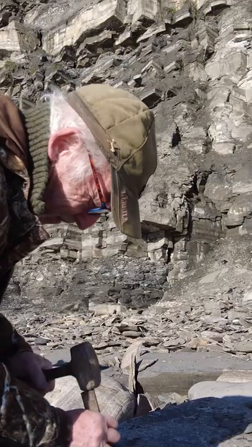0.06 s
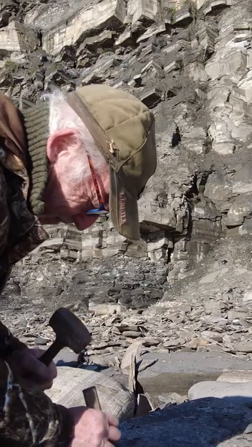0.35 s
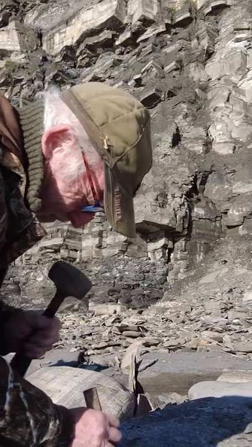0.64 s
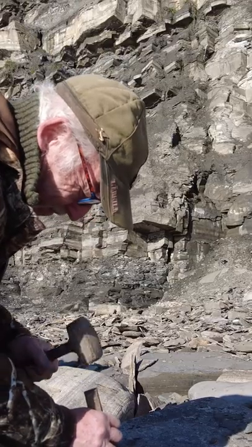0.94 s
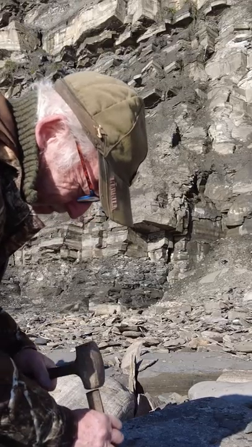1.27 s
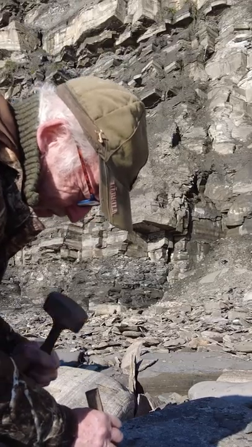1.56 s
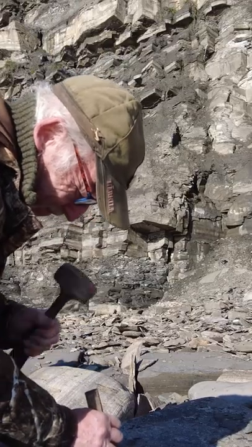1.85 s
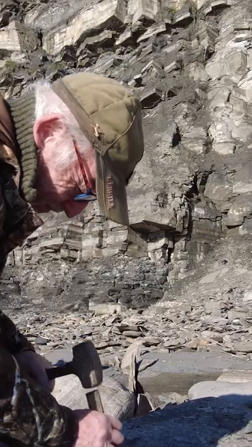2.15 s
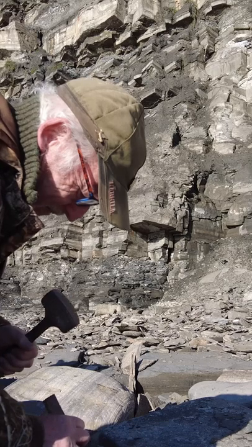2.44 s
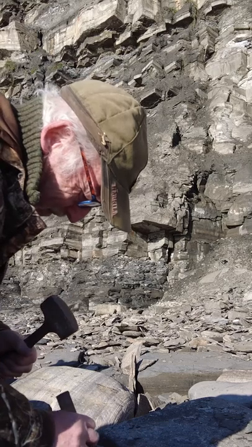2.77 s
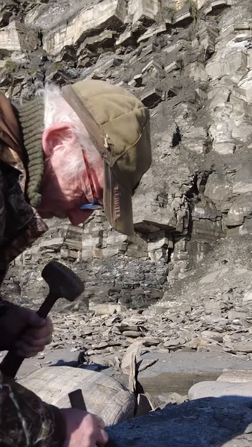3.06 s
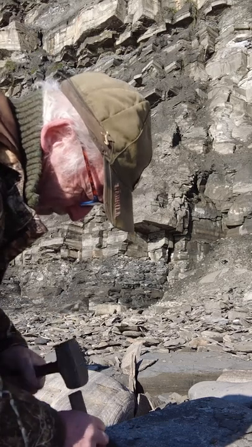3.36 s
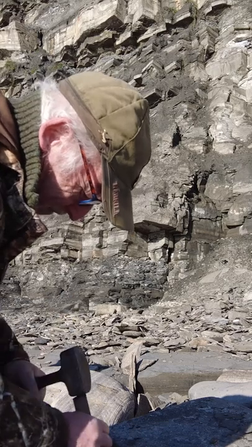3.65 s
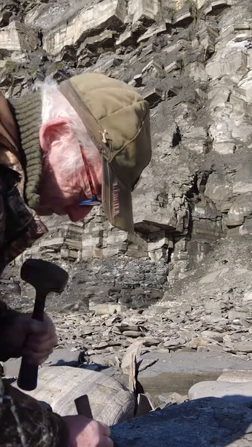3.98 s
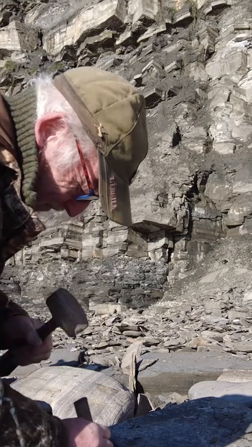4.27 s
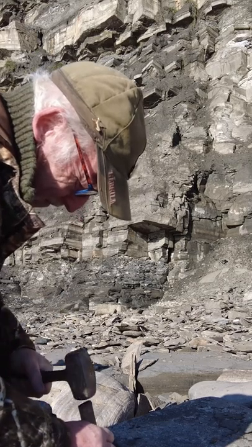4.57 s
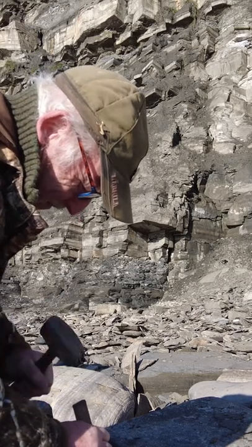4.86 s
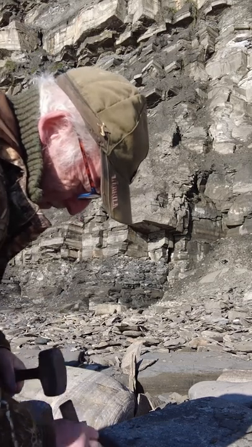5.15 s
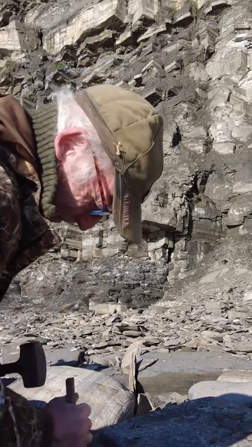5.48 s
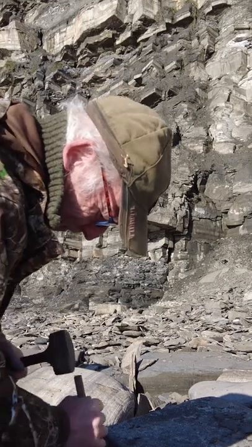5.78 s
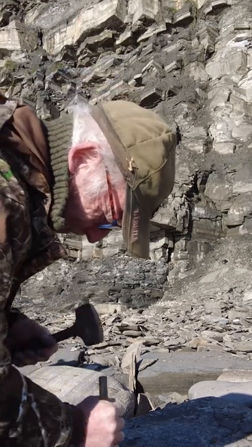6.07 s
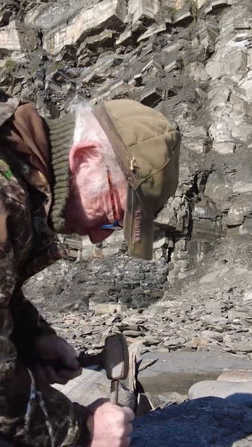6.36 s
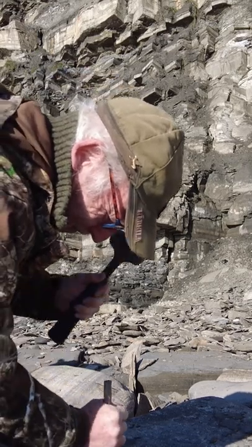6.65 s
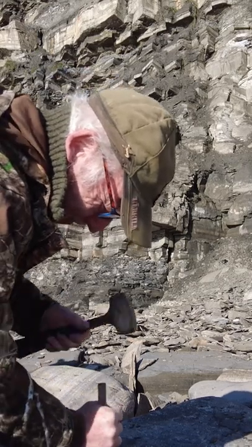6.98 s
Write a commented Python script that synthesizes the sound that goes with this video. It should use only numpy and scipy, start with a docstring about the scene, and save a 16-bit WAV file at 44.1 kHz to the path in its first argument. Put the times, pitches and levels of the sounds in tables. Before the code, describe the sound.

Close by, a mallet drives a steel chisel into a boulder on a beach. Each blow is a sharp crack with a dull rock thud and a short steel ring, often followed by a lighter bounce. Six steady blows come, then five, then two. In the second pause, chips tick and the chisel faintly clinks and scrapes. A cliff returns a light echo over faint distant surf and a little wind on the microphone.

```python
"""A mallet drives a hand-held steel chisel into a boulder on a beach, in three runs of blows.
Each blow is a crack, a thud of rock and a short ring of steel; mostly the mallet bounces after it.
Blows differ in force, seat of the edge, looseness of grip, squareness of the hit and bite.
Chips land; in a pause the chisel clinks and drags to a new spot. A cliff throws the blows back.
Far surf and a little wind lie underneath."""
import sys
import numpy as np
from scipy import signal
from scipy.fft import rfft, irfft
from scipy.io import wavfile

SR = 44100
rng = np.random.default_rng(int(sys.argv[2]) if len(sys.argv) > 2 else 0)


def wav_record(signal):
    """Record a signal, one row per channel, as 16-bit PCM in the file named by sys.argv[1]."""
    frames = np.transpose(np.atleast_2d(signal))
    bounded = np.clip(frames, -1, 1)
    # unit amplitude maps onto the largest positive 16-bit level
    quanta = np.round(bounded * 32767).astype(np.int16)
    wavfile.write(sys.argv[1], SR, quanta)


N = 313992
T = np.arange(N) / SR
HIT_T = T[:SR // 4]


def from_db(db):
    """Decibels to gain."""
    return 10 ** (np.asarray(db) / 20)


def unit_rms(x):
    """Scale to rms 1."""
    return x / np.sqrt(np.mean(x ** 2) + 1e-20)


def at_hz(points, hz):
    """Interpolate a table over log frequency."""
    known, values = np.transpose(points)
    return np.interp(np.log(hz + 1), np.log(known), values)


def bins_hz(x):
    """Frequencies of the spectrum of x."""
    return np.fft.rfftfreq(x.shape[-1], 1 / SR)


def coloured(x, colour):
    """Filter by rows of f/Hz, level/dB."""
    return irfft(rfft(x) * from_db(at_hz(colour, bins_hz(x))), x.shape[-1])


def fade(t60_s):
    """Exponential decay, 60 dB in t60_s."""
    return np.exp(-np.log(1000) * HIT_T / t60_s)


def swells(rows):
    """One Gaussian rise and fall per row."""
    return sum(from_db(db) * np.exp(-(2 * (T - s) / length_s) ** 2) for s, length_s, db in rows)


def levelled(x, db):
    """Scale a hit so its energy, spread over 10 ms, has this level."""
    return x * from_db(db) / np.sqrt(np.sum(x ** 2) / (SR / 100))


def add(track, start_s, sound):
    """Mix a sound in at start_s."""
    at = min(max(round(start_s * SR), 0), N)
    track[at:at + len(sound)] += sound[:N - at]


def ring(modes, spread_db, detune, stagger_s):
    """Struck modes; grip and contact point vary their strength, pitch and onset."""
    out = 0
    for (hz, db, t60_s), (strength, shift, late) in zip(modes, rng.standard_normal((len(modes), 3))):
        age_s = np.maximum(HIT_T - abs(late) * stagger_s, 0)
        envelope = from_db(db + spread_db * strength) * fade(t60_s)
        out = out - envelope * np.sin(2 * np.pi * hz * (1 + detune * shift) * age_s)
    return out


def tilted(modes, db_per_oct):
    """Tilt mode levels about the first mode."""
    return [(hz, db + db_per_oct * np.log2(hz / modes[0][0]), t60_s) for hz, db, t60_s in modes]


# surf spectrum: f/Hz, level/dB
SURF_COLOUR = [(53, -39.5), (90, -5), (224, -10.5), (296, -6.5), (385, -7), (457, -5.5), (532, -6),
               (568, -5), (1140, -14), (1350, -9.5), (2130, -17), (2710, -18), (3910, -23), (6160, -29.5),
               (16000, -43)]
# background of surf and lingering cliff reverberation: t/s, level/dB before gain_db
SURF_LEVEL = [(0.0, -61), (2.99, -63), (3.43, -61), (6.09, -62.5), (6.68, -60.5), (7.12, -59.5)]
# surf, left against right: f/Hz, coherence
SURF_COHERENCE = [(60, 0.85), (130, 0.91), (290, 1), (640, .42), (1400, .25), (4000, .3), (15000, 0.32)]


def surf(gain_db=2):
    """Far surf: noise, wide in the treble, slightly louder during the runs of blows as the cliff's
    reverberation lingers."""
    mid, side = rfft(rng.standard_normal((2, N)))
    coherence = np.clip(at_hz(SURF_COHERENCE, bins_hz(T)), 0, 1)
    wide = irfft(np.sqrt(1 + coherence) * mid + np.sqrt(1 - coherence) * side * [[1], [-1]], N)
    level_db = gain_db + np.interp(T, *np.transpose(SURF_LEVEL))
    return unit_rms(coloured(wide, SURF_COLOUR)) * from_db(level_db)


# gusts: middle t/s, length/s, level/dB
GUSTS = [(1.07, .25, -49.5), (1.63, 0.1, -43.5), (3.45, .2, -53.5), (5.22, .07, -51)]


def wind(band_hz=(18, 48), breeze_db=-60):
    """Wind on the microphone: a low steady rumble with gusts."""
    band = signal.butter(2, band_hz, "band", fs=SR, output="sos")
    buffeting = unit_rms(signal.sosfilt(band, rng.standard_normal(N)))
    return buffeting * np.hypot(from_db(breeze_db), swells(GUSTS))


def echo_envelope(faces, t):
    """Each rough face answers after its delay, swells as more of it is reached, and dies away."""
    power = 0
    for delay_s, db, swell_s in faces:
        age = np.maximum(t - delay_s, 0) / swell_s
        power = power + (from_db(db) * age * np.exp(1 - age)) ** 2
    return np.sqrt(power)


# echoing faces: nearby beach stones (first close row), the close cliff, and further along: delay/s, relative
# level/dB, swell/s
CLOSE_FACES = [(.006, -15.5, .02), (.047, -2, .009), (0.074, -4.5, 0.012)]
FAR_FACES = [(0.099, -4, .065), (.163, 1.5, .009), (.212, -2, .016), (.27, -17, .09)]
# their echo spectra: f/Hz, level/dB
CLOSE_COLOUR = [(150, 2), (600, -3.5), (1200, 1.5), (2300, 8), (3100, 4), (4200, 2.5), (7000, 2.5),
                (10000, 0), (15000, 0)]
FAR_COLOUR = [(200, -11.5), (1000, 0), (3100, 5), (4000, 2), (6000, -1.5), (10000, -8.5), (15000, -12)]


def cliff_echo(x, faces, colour, grain_db):
    """Countless ledges echo, unlike left and right; moving air reshuffles them for each blow."""
    t = T[:SR * 2 // 3]
    envelope = echo_envelope(faces, t)
    starts = [0] + [round((s - .01) * SR) for s, *_ in BLOWS[1:]]
    out = np.zeros((2, N))
    for start, end in zip(starts, starts[1:] + [N]):
        ledges = rng.standard_normal((3, len(t))) * from_db(grain_db * rng.standard_normal(len(t)))
        response = (ledges[:2] + .65 * ledges[2]) * envelope  # third row common to both sides
        response /= np.sqrt(np.sum(response ** 2) / 2)
        echo = signal.fftconvolve(x[None, start:end], response, axes=1)
        out[:, start:start + echo.shape[1]] += echo[:, :N - start]
    return coloured(out, colour)


# clang towards the cliff, blurred by the hand: f/Hz, level/dB, t60/s
BROAD_CLANG = [(3090, 0, .015)]


def towards_cliff(clang_db=-30, ping_db=-33):
    """Outgoing sound: each blow's bare click, and the steel as far as the grip lets it out."""
    out = np.zeros(N)
    impulse = 1.0 * (HIT_T == 0)
    click = np.roll(coloured(impulse, CRACK_COLOUR), 32)
    for s, force_db, seat_db, loose_db, square_db, *_ in BLOWS:
        clang = ring(stiffened(BROAD_CLANG, seat_db), spread_db=1, detune=.013, stagger_s=.0008)
        ping = ring(PING, spread_db=0, detune=.001, stagger_s=.00057)
        add(out, s, levelled(click, CRACK_DB + force_db))
        add(out, s, levelled(clang, clang_db + force_db + loose_db))
        add(out, s, levelled(ping, ping_db + force_db + square_db))
    return out


# sand under the boulder: f/Hz, relative level/dB, t60/s
SAND_MODES = [(62.6, -3.5, 0.11), (82, -1, 0.34)]


def sand(re_thud_db=-22):
    """Each blow pushes the boulder a little into the sand."""
    out = np.zeros(N)
    for s, force_db, seat_db, *_ in BLOWS:
        thump = ring(SAND_MODES, spread_db=4, detune=.037, stagger_s=.002)
        add(out, s, levelled(thump, thud_level_db(force_db, seat_db) + re_thud_db))
    return out


# edge dragged to its new spot: middle t/s, length/s, level/dB
DRAGS = [(5.5, 0.057, -70), (5.7, 0.21, -72)]


def dragging(grain_db=4):
    """Sand grains rasp faintly between steel and stone."""
    grains = rng.standard_normal(N) * from_db(grain_db * rng.standard_normal(N))
    rasp = coloured(grains, [(1500, -25), (4000, 1), (6000, -2), (12000, -10), (16000, -11.5)])
    return unit_rms(rasp) * swells(DRAGS)


# larger stone chips: t/s, peak level/dB, f/Hz
CHIPS = [(.416, -42, 6150), (5.2533, -37.5, 5670), (5.2762, -42.5, 4370), (5.3702, -46.5, 6350),
         (5.422, -46.5, 3500), (6.751, -46, 2160)]


def chips(t60_s=.011, grit_flight_s=.28, grit_db=-57, grit_hz=7074, scatter=.22):
    """Chips tick as they land, as does a crumb of grit thrown by each blow."""
    out = np.zeros(N)
    factors = np.exp(scatter * rng.standard_normal((len(BLOWS), 2)))
    grit = [(s + grit_flight_s * flight, grit_db, grit_hz * pitch)
            for (s, *_), (flight, pitch) in zip(BLOWS, factors)]
    for s, db, hz in CHIPS + grit:
        edges_hz = [min(hz * .8, SR / 4), min(hz * 1.45, .45 * SR)]
        band = signal.butter(2, edges_hz, "band", fs=SR, output="sos")
        tick = signal.sosfilt(band, rng.standard_normal(len(HIT_T)) * fade(t60_s))
        add(out, s, from_db(db) * tick / np.abs(tick).max())
    return out


# loosely held chisel: f/Hz, relative level/dB, t60/s
LOOSE_STEEL = [(3978, 0, .11), (6325, -12, .086), (7951, -10, .09), (9200, -8, .08), (12460, -15, .065)]


def touch(db, db_per_oct, tick_db):
    """The loose chisel ticks and rings; a harder, shorter touch favours high modes."""
    steel = ring(tilted(LOOSE_STEEL, db_per_oct), spread_db=1, detune=.001, stagger_s=.0005)
    return levelled(steel, db) + levelled(crack(db_per_oct=-2.5, t60_s=.018), db + tick_db)


# loose chisel touches stone: t/s, level/dB
CLINKS = [(5.314, -66), (5.4894, -61.5), (5.568, -56)]
# mallet is rested on the chisel: t/s, rock level/dB, steel level/dB
MALLET_RESTS = [(2.756, -48, -60.5), (5.964, -50.5, -81)]


def handling():
    """The chisel clinks on the stone; the resting mallet bumps the boulder through it."""
    out = np.zeros(N)
    for s, db in CLINKS:
        add(out, s, touch(db, db_per_oct=-.5, tick_db=-8))
    for s, bump_db, steel_db in MALLET_RESTS:
        add(out, s, touch(steel_db, db_per_oct=18, tick_db=2.8))
        add(out, s, levelled(ring(THUD, spread_db=1.5, detune=.02, stagger_s=.001), bump_db))
    return out


# mallet drops back on the chisel: t/s, base level/dB
BOUNCES = [(0.5013, -33), (0.895, -31), (1.3084, -38), (1.7235, -35), (2.160, -32), (3.353, -35),
           (4.181, -38), (4.593, -35.5), (5.010, -45.5), (6.465, -22.5), (6.922, -34)]


def bounces(tick_db=-4, rock_db=-5, clang_db=-6, follow=.59):
    """A softer contact: less crack, more ring, with the seat and grip of the blow before."""
    out = np.zeros(N)
    for s, db in BOUNCES:
        _, _, seat_db, loose_db, *_ = [blow for blow in BLOWS if blow[0] < s][-1]
        tick = crack(db_per_oct=-3, t60_s=.02)
        rock = ring(THUD + KNOCK, spread_db=2.5, detune=.013, stagger_s=.00088)
        clang = ring(stiffened(CLANG, seat_db), spread_db=5.5, detune=.008, stagger_s=.00046)
        add(out, s, levelled(tick, db + tick_db))
        add(out, s, levelled(rock, db + rock_db + follow * seat_db))
        add(out, s, levelled(clang, db + clang_db + follow * loose_db))
    return out


# spectrum of the boulder's lesser modes: f/Hz, level/dB
RUMBLE_COLOUR = [(100, -22), (170, -1), (350, 2), (700, -1.5), (1100, -4), (1500, -11), (2200, -17.5),
                 (4000, -27.5)]


def rumble(t60_s=.085, build_s=.0033, tail_db=-21, tail_t60_s=.2):
    """Crowded modes blur into a dull noise that builds as the shock spreads through the boulder."""
    envelope = (fade(t60_s) + from_db(tail_db) * fade(tail_t60_s)) * (1 - np.exp(-HIT_T / build_s))
    return coloured(rng.standard_normal(len(HIT_T)), RUMBLE_COLOUR) * envelope


# crack spectrum: f/Hz, level/dB
CRACK_COLOUR = [(500, -7.5), (1200, -10.5), (1800, -1.5), (2250, -14), (2900, -3), (3600, -6), (4200, 0.5),
                (6200, -1.5), (7300, -9), (9000, -5.5), (10200, -3.5), (10900, -15.5), (13000, -14),
                (16000, -24.5)]


def crack(db_per_oct, t60_s=.023, snap_t60_s=.006, tail_db=-26, tail_t60_s=.08,
          rise_s=.00064, echo_s=.0033, echo_gain=.3):
    """Steel crushes stone: a snap and a dense, fast-dying burst, repeated by the rock nearby."""
    colour = [(hz, db + db_per_oct * np.log2(hz / 5000)) for hz, db in CRACK_COLOUR]
    noise = coloured(rng.standard_normal(len(HIT_T)), colour)
    decay = fade(snap_t60_s) + fade(t60_s) + from_db(tail_db) * fade(tail_t60_s)
    burst = noise * decay * (1 - np.exp(-HIT_T / rise_s))
    return burst + echo_gain * np.interp(HIT_T - echo_s, HIT_T, burst, left=0)


def stiffened(modes, seat_db, hz_per_db=11):
    """A firm seat raises the pitch of the clang."""
    return [(hz + hz_per_db * seat_db, db, t60_s) for hz, db, t60_s in modes]


def thud_level_db(force_db, seat_db):
    """A hard blow and a firm seat shake the boulder more."""
    return THUD_DB + 1.3 * force_db + .27 * seat_db


# modes: f/Hz, relative level/dB, t60/s
THUD = [(182, 2, .04), (235, -3, .06), (275, -3, .04), (335, -1, .04), (455, -5, .04)]  # boulder
SLAB = [(548.5, 0.5, .10), (676, -10, .06)]  # loose slab
KNOCK = [(810, -2, .03), (915, -1, .027), (1020, 0, .032), (1100, -7, .05), (1420, -10, .04),
         (1810, -9, .018)]  # stone under the edge
CLANG = [(2900, -4, .035), (3040, 0, .04), (3180, -3, .03)]  # mallet on chisel
BENDING = [(4045, 0, .027), (6345, 0, .024), (7930, -16, .03), (9140, -2, .026), (12430, -18, .03)]  # gripped steel, bending
PING = [(10250, -0.5, 0.058), (10120, -4.5, 0.064)]  # gripped steel, lengthwise
# blows, 0 dB = ordinary: t/s, force/dB, seat firmness/dB, grip looseness/dB, squareness/dB,
# bite/dB, edge clink f/Hz
BLOWS = [(0.0924, 0.5, -1, -13.5, 0.5, 7.5, 4350), (0.4841, -1, -2, 0.5, -3.5, -8, 5320),
         (0.8745, 2, 4.5, -2.5, -5.5, -1.5, 4430), (1.2791, 1, 7.5, 8, 2.5, 1.5, 4944),
         (1.6987, 0.5, 6, 11.5, -3, 5, 4124), (2.1244, 0.5, 6.5, -7.5, 6, -7.5, 5000),
         (3.3333, 2.5, 5.5, -8, -8.5, -0.5, 4280), (3.7538, 3, -1.5, -9.5, 3, 0.5, 4403),
         (4.161, 1, -5, 3, -1, 4, 5880), (4.5682, 2, -4, -1.5, 2, 1, 4280),
         (4.9845, -1, -6.5, 8, 0.5, -8, 4320), (6.4555, -2.5, -9, -9.5, -2, 5.5, 4116),
         (6.9, 1, -4, -1, 0.5, -7, 4090)]
CRACK_DB, THUD_DB, SLAB_DB, KNOCK_DB = -18.5, -23.5, -30.5, -26.5
CLANG_DB, BENDING_DB, PING_DB, CLINK_DB = -30.5, -33.5, -31.5, -27.5


def chisel_blows(rumble_re_thud_db=-11, clink_t60_s=.018):
    """Rock and steel sound together: a firm seat spares the slab, a loose grip lets the steel ring."""
    out = np.zeros(N)
    for s, force_db, seat_db, loose_db, square_db, bite_db, clink_hz in BLOWS:
        thud_db = thud_level_db(force_db, seat_db)
        contact = [(tilted(THUD, db_per_oct=1.8 * force_db - .35 * seat_db), thud_db),
                   (SLAB, SLAB_DB + force_db - .4 * seat_db),
                   (KNOCK, KNOCK_DB + force_db + seat_db),
                   (stiffened(CLANG, seat_db), CLANG_DB + force_db + .55 * loose_db),
                   ([(clink_hz, 0, clink_t60_s)], CLINK_DB + force_db + bite_db)]
        steel = [(BENDING, BENDING_DB + force_db + .6 * loose_db),
                 (PING, PING_DB + force_db + square_db)]
        for modes, db in contact:
            add(out, s, levelled(ring(modes, spread_db=1.2, detune=.008, stagger_s=.0003), db))
        for modes, db in steel:
            add(out, s, levelled(ring(modes, spread_db=1.5, detune=.002, stagger_s=.0006), db))
        add(out, s, levelled(rumble(), thud_db + rumble_re_thud_db))
        crack_db_per_oct = -.03 + .12 * (seat_db + bite_db)
        add(out, s, levelled(crack(crack_db_per_oct), CRACK_DB + force_db))
    return out


# phase between the microphone ports: f/Hz, left lead/rad
PORT_PHASE = [(100, 0), (300, .45), (560, 1.1), (720, 0), (900, -1.3), (1550, .6), (3100, -.65), (4000, .3),
              (5000, -.65), (7000, .45), (9200, .5), (10200, 1), (12300, -1.3), (15300, .6)]


def at_ports(x):
    """Near sound bends round the microphone body and reaches its two ports out of step."""
    half_lead_rad = at_hz(PORT_PHASE, bins_hz(x)) / 2
    return irfft(rfft(x) * np.exp(1j * half_lead_rad * [[1], [-1]]), N)


def scene(close_db=-25, far_db=-35.5, near_share=.32, low_cut_hz=181):
    """Rock and steel nearby, two cliff echoes, surf and wind."""
    work = chisel_blows() + bounces() + handling() + chips() + dragging()
    # a small rock radiates little deep bass
    near = signal.sosfilt(signal.butter(4, low_cut_hz, "high", fs=SR, output="sos"), work)
    outgoing = towards_cliff() + near_share * near
    close_echo = from_db(close_db) * cliff_echo(outgoing, CLOSE_FACES, CLOSE_COLOUR, grain_db=1)
    far_echo = from_db(far_db) * cliff_echo(outgoing, FAR_FACES, FAR_COLOUR, grain_db=3.5)
    return at_ports(near) + sand() + close_echo + far_echo + surf() + wind()


def record(dry, cutoff_hz=16000):
    """Soft clip, then steep low-pass."""
    return signal.sosfilt(signal.ellip(10, .1, 80, cutoff_hz, fs=SR, output="sos"), np.tanh(dry))


dry = scene()
out = record(dry)
wav_record(out)
```